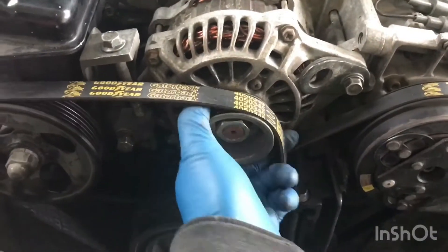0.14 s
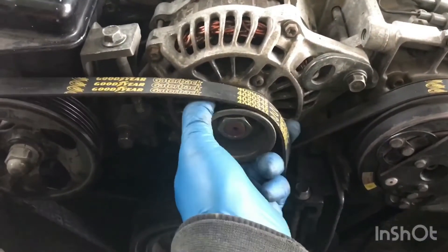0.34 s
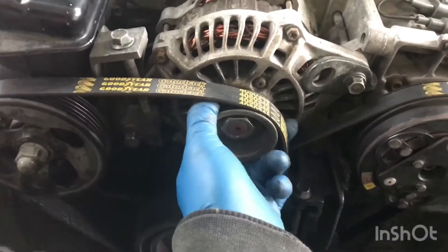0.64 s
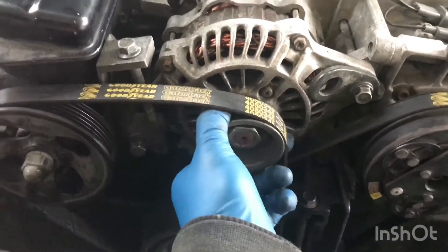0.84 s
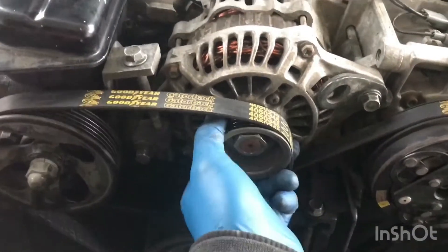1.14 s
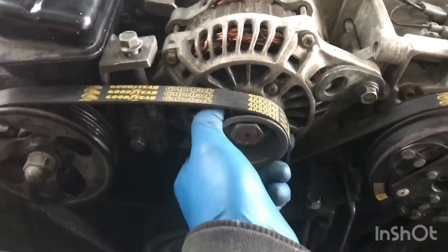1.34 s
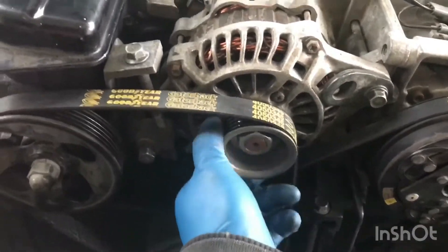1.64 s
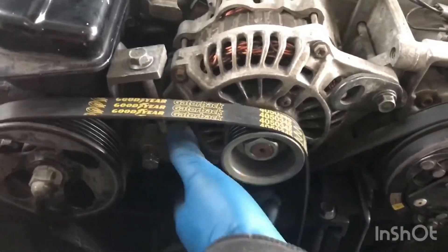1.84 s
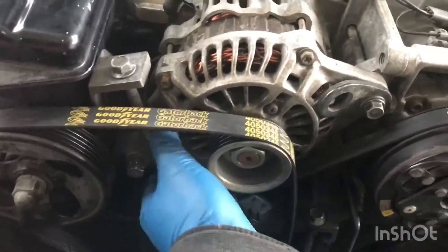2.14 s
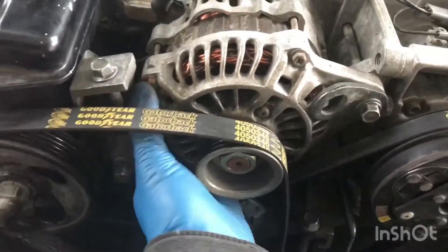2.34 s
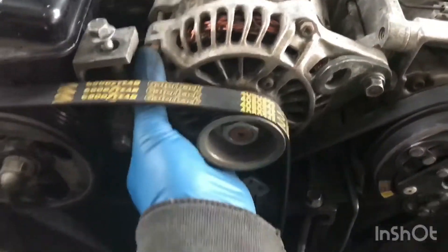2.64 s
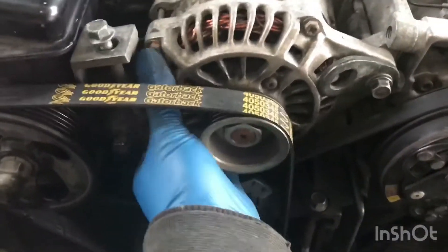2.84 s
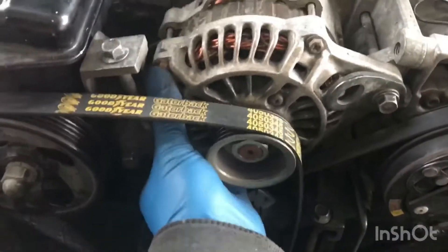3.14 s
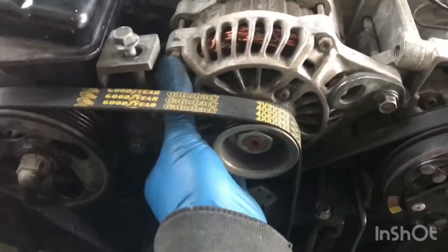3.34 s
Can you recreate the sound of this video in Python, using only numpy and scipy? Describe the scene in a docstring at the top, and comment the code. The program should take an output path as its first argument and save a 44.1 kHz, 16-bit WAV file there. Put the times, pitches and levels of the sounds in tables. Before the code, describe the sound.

Belt ribs snap over a pulley rim, bright and hard with short metallic rings, after quiet glove rubs and one rough squeak; close microphone, small engine bay, light workshop echo, steady faint air and rumble.

```python
"""Soft strokes of a gloved hand on a ribbed belt, over steady air and a wavering low rumble.
Stick-slip friction squeaks once, with a narrow noisy creak from just before the squeak until just after it.
Ribs snap over the pulley rim as the hand works the belt off: each snap is a broadband crack, treble first,
with damped modes of pulley and bracket; soft scrapes, faint long rings and slaps of the slack span join in.
Decaying noise gives the short tails of a quiet engine bay and its workshop around a close microphone."""
import sys
import numpy as np
from scipy import signal
from scipy.fft import rfft, irfft
from scipy.io import wavfile
from scipy.ndimage import uniform_filter1d

SR = 44100
rng = np.random.default_rng(int(sys.argv[2]) if len(sys.argv) > 2 else 0)


def wav_record(signal):
    """Record a signal, one row per channel, as 16-bit PCM in the file named by sys.argv[1]."""
    frames = np.transpose(np.atleast_2d(signal))
    bounded = np.clip(frames, -1, 1)
    # unit amplitude maps onto the largest positive 16-bit level
    quanta = np.round(bounded * 32767).astype(np.int16)
    wavfile.write(sys.argv[1], SR, quanta)


N = 154350  # samples

# spectrum of the steady air: (frequency [Hz], relative density [dB per Hz])
AIR_SPECTRUM = [(76, -24.5), (130, -0.5), (172, -14), (238, -11.5), (342, -15), (935, -19), (1170, -20),
                (1400, -21.5), (2090, -31.5), (10500, -54), (16000, -45.5)]
AIR_DB = -55.5
# spectrum of the low rumble: (frequency [Hz], relative density [dB per Hz])
RUMBLE_SPECTRUM = [(20, -34), (32, -16), (42, 0.5), (62, 5), (90, 6), (125, -15.5), (170, -11.5),
                   (300, -39)]
# wavering of the rumble: (time [s], level [dB])
RUMBLE_ENVELOPE = [(0, -54.5), (.2, -54), (.28, -45.5), (.5, -49), (.62, -57), (.85, -48), (1.55, -55),
                   (1.95, -55), (2.1, -46), (2.3, -49.5), (2.9, -49.5), (3.2, -51)]

# strokes of glove and belt: (peak time [s], rise [s], fall [s], level [dB], treble tilt [dB per octave])
RUB_STROKES = [(0.1, 0.0065, .018, -51, 3.5), (.17, 0.046, 0.04, -52, -1), (.235, 0.044, 0.043, -53.5, -2),
               (.39, 0.086, .05, -71, 1), (.92, 0.057, .05, -58, -5), (1.015, 0.027, .03, -56, 1.5),
               (1.75, 0.099, .045, -56.5, 1.5), (1.866, 0.02, .014, -46, 3),
               (1.91, 0.036, .05, -52.5, -0.5), (2.011, 0.076, .055, -55, 2),
               (2.159, 0.015, .04, -56, -2.5), (2.271, 0.024, .03, -50, 2.5), (2.385, 0.034, 0.022, -50, 6),
               (2.47, 0.066, .12, -63, 1), (2.635, 0.018, 0.032, -60.5, -3.5),
               (2.729, 0.012, 0.021, -40.5, -5.5), (3.028, 0.019, 0.014, -47.5, -3)]
# spectrum of the friction grains before the tilt: (frequency [Hz], relative density [dB per Hz])
RUB_SPECTRUM = [(300, -20), (1900, -6), (3200, -2), (5500, -7), (8500, -8.5), (10500, -12.5), (14000, -11),
                (17000, -21)]
RUB_GRAIN_DB, RUB_FLUTTER_DB = 1.5, 2.5  # rms of the fast and the slow level variation
CATCHES_PER_S, CATCH_DB = 30, 16.5  # single sticks and slips; gain of what each adds to its grain

# stick-slip tone: (time [s], pitch [Hz], level of partials 1, 2, 3 and 4 [dB each])
SQUEAK_TRACK = [(0.783, 372, -69, -53, -85, -79), (0.811, 371.5, -43, -40.5, -50, -52),
                (0.843, 388.7, -35.5, -39, -44, -55.5), (0.867, 392.2, -42, -45, -49.5, -61.5),
                (0.89, 387.6, -46, -42, -51, -67), (0.92, 376.8, -53, -37.5, -48, -64),
                (0.96, 387.7, -66, -70, -52, -65)]
SQUEAK_JITTER = 0.018  # rms pitch deviation, as a fraction
SQUEAK_EDGE_DB = -21  # sixth partial relative to the third
SQUEAK_RASP_DB, RASP_HZ = -8, 107.1  # rough sidebands at partial 2, and roughly how far they reach
SQUEAK_WET_DB, SQUEAK_T60_S = -1.5, 0.81  # workshop tail of the squeak
SQUEAK_TAIL_LO_HZ = 563  # the workshop returns little below this
# narrow noisy creak, from just before the squeak until just after it: (time [s], level [dB])
CREAK_ENVELOPE = [(.745, -73), (.772, -52.5), (.82, -48.5), (.97, -55), (1.03, -67)]
CREAK_HZ, CREAK_WIDTH_HZ = 508, 110

# rib snaps: (time [s], level in each of the five bands [dB each], contact resonance [Hz],
# crack decay constant at 3 kHz [ms])
RIB_SNAPS = [(1.1719, -59, -56, -44, -41.5, -47, 8470, 2.3), (1.29, -68, -40, -34.5, -27.5, -35, 8190, 2.7),
             (1.2949, -47, -31.5, -29.5, -36, -65, 1220, 2.1),
             (1.3651, -61, -40, -26, -39.5, -77, 2640, 5.2), (1.64, -45, -16, -19.5, -21.5, -37, 1222, 3.2),
             (1.6454, -35.5, -53, -26.5, -49, -35, 1225, 8.9), (1.6551, -37, -24, -29, -33, -41, 1170, 4),
             (2.0568, -57, -53, -41.5, -45, -81, 2160, 6.6),
             (2.291, -48.5, -28.5, -13.5, -21, -25.5, 2638, 4.7),
             (2.7369, -40.5, -32, -21, -24.5, -28.5, 7820, 2.7),
             (2.749, -53, -50, -51.5, -33, -41, 9520, 2.2),
             (3.0375, -36, -17, -14, -16.5, -22.5, 8970, 4.6),
             (3.041, -31.5, -17, -26, -24.5, -38.5, 1177, 4.8),
             (3.2909, -55, -55, -42, -40, -52, 5520, 2.7), (3.2980, -42, -34, -25, -23, -24.5, 14500, 4.8),
             (3.3260, -42, -37.5, -27.5, -19, -29.5, 8650, 3), (3.3411, -47.5, -38, -21, -49, -53, 1950, 3)]
# edges of the five snap bands: (frequency [Hz])
SNAP_BAND_EDGES = [200, 900, 1600, 4400, 10000, 16500]
# spectrum of the crack before its band levels: (frequency [Hz], relative level [dB])
CRACK_SPECTRUM = [(150, -3), (280, -1), (380, -7.5), (590, 0), (800, 1), (1000, -4.5), (1280, -4),
                  (1700, 0.5), (2250, -4), (2700, -4), (3800, -6.5), (4900, 0), (6600, -5), (9100, -4.5),
                  (10100, -14), (11400, -6), (13000, -12), (16000, -18.5)]
CRACK_RISE_S = 0.00044
SPREAD_S = 0.0016  # bending-wave delay at 1 kHz, inversely proportional to frequency
TREBLE_DAMPING = 0.17  # decay time falls as this power of frequency
# modes of pulley and bracket: (frequency [Hz], relative level [dB], t60 [s])
METAL_MODES = [(607.7, -5, 0.16), (973, -2, 0.067), (1135, -2, 0.083), (1226, 6.5, .05), (1322, 1.5, 0.057),
               (1400, 2.5, 0.051), (1963, 3.5, 0.029), (2582, 3, .023), (3120, -5, .035),
               (3607, -7.5, 0.057), (4048, -2.5, .04), (6780, -7.5, .06), (9200, -3.5, 0.032),
               (9319, -7, 0.056)]
MODE_DB, MODE_SCATTER_DB = -13.5, 1  # common offset, and rms scatter from snap to snap
MODE_DRIFT = 0.002  # rms detuning by the pull of the belt, as a fraction
CONTACT_DB, CONTACT_T60_S = -0.5, 0.016  # relative level and short ring of the spot that the rib hits

# reflections: (centre [Hz], bay level [dB], bay t60 [s], workshop level [dB], workshop t60 [s])
SPACE_BANDS = [(250, -1, 0.18, -14, 1), (674, -2.5, 0.14, -11.5, 0.63), (1400, -14, 0.068, -28.5, .6),
               (2990, -12.5, 0.15, -21, 0.4), (7160, -12.5, 0.11, -25, 0.42), (13000, -26, 0.1, -23, 0.083)]
RING_SEND_DB = -5.5  # the modes feed the echoes less than the crack does

# soft scrapes of the belt on the rim: (time [s], decay constant [s], level [dB], centre [Hz])
RIM_SCRAPES = [(1.312, 0.042, -52.5, 620), (1.331, 0.031, -43.5, 1660), (1.348, 0.01, -42, 890),
               (1.386, 0.0074, -42, 2270), (1.608, 0.015, -47, 1940), (1.804, 0.019, -54, 290),
               (2.176, 0.0035, -44.5, 7970)]
# long faint rings of the freed pulley: (time [s], frequency [Hz], level [dB], t60 [s])
LONG_RINGS = [(1.365, 1466, -29.5, 0.15), (1.366, 1986, -29.5, 0.11), (1.366, 3480, -49, .24),
              (1.366, 5340, -69, .9), (1.366, 6850, -48, 0.12), (2.738, 1943, -51, 0.6),
              (3.039, 6775, -43.5, 0.28), (3.04, 3521, -42, 0.28), (3.327, 5335, -60, 1),
              (3.341, 1955, -48, 0.74)]
# slaps of the slack belt: (time [s], level [dB])
BELT_SLAPS = [(1.656, -41), (2.295, -57), (2.741, -57.5), (3.045, -37.5)]
# modes of the belt span: (frequency [Hz], relative level [dB], t60 [s])
BELT_MODES = [(129.5, 4.5, 0.12), (191.6, -9, 0.72), (254, 6.5, 0.091), (323, -12.5, 0.16)]

TOP_HZ = 15900  # upper limit of the sound


def undb(db):
    """Logarithmic level: converts decibels to an amplitude gain."""
    return 10 ** (np.asarray(db) / 20)


def unit(x):
    """Normalisation: scales to an rms of 1."""
    return x / np.sqrt(np.mean(x ** 2))


def add(out, start, x):
    """Superposition: mixes x into out from a start time in seconds."""
    i = int(start * SR)
    out[i:i + len(x)] += x[:len(out) - i]


def band(x, lo, hi, order=3):
    """Band limitation: a causal Butterworth band-pass."""
    hi = min(hi, SR / 2 - 1000)
    return signal.sosfilt(signal.butter(order, [lo, hi], "band", fs=SR, output="sos"), x)


def colour(x, points, tilt_db=0):
    """Spectral shaping: weights x by (Hz, dB) points and a tilt per octave, then sets its rms to 1."""
    hz, db = np.array(points).T
    octave = np.log2(np.fft.rfftfreq(len(x), 1 / SR) + 1)  # the 1 avoids log of zero
    weight_db = np.interp(octave, np.log2(hz), db, left=-90) + tilt_db * octave
    return unit(irfft(rfft(x) * undb(weight_db), len(x)))


def walk(rate):
    """Smoothed chance: random steps at a rate in Hz, averaged twice, with an rms of 1."""
    k = int(SR / rate)
    steps = np.repeat(rng.standard_normal(N // k + 1), k)
    return unit(uniform_filter1d(uniform_filter1d(steps, k), k)[:N])


def fade(t, t60):
    """Exponential decay: falls by 60 dB in t60 seconds."""
    return np.exp(-np.log(1000) * t / t60)


def ring(modes, t):
    """Modal superposition: sums damped sines of random phase."""
    total = 0
    for hz, db, t60 in modes:
        total = total + undb(db) * fade(t, t60) * np.sin(2 * np.pi * (hz * t + rng.random()))
    return total


def workshop():
    """Coloured noise: steady air, and a low rumble with a wavering level."""
    level_db = np.interp(np.arange(N) / SR, *np.array(RUMBLE_ENVELOPE).T)
    air = undb(AIR_DB) * colour(rng.standard_normal(N), AIR_SPECTRUM)
    rumble = undb(level_db) * colour(rng.standard_normal(N), RUMBLE_SPECTRUM)
    return air + rumble


def rubbing():
    """Sliding friction: fine irregular grains of noise swell with each stroke of glove and belt."""
    out, t = np.zeros(N), np.arange(N) / SR
    catches = undb(CATCH_DB) * (rng.random(N) < CATCHES_PER_S / SR)
    roughness = undb(RUB_GRAIN_DB * walk(1500) + RUB_FLUTTER_DB * walk(70))
    grains = unit(rng.standard_normal(N) * (1 + catches) * roughness)
    for peak, rise, fall, db, tilt_db in RUB_STROKES:
        swell = np.exp(-0.5 * ((t - peak) / np.where(t < peak, rise, fall)) ** 2)
        shifted = np.roll(grains, rng.integers(N))  # different grains under each stroke
        out += undb(db) * swell * colour(shifted, RUB_SPECTRUM, tilt_db)
    return out


def squeak():
    """Stick-slip oscillation: a noisy creak under rough, unsteady harmonics that linger in the workshop."""
    t = np.arange(N) / SR
    when, hz, *levels = np.array(SQUEAK_TRACK).T
    pitch = np.interp(t, when, hz) * (1 + SQUEAK_JITTER * walk(200))
    phase = 2 * np.pi * np.cumsum(pitch) / SR
    partials = list(enumerate(levels, 1)) + [(6, levels[2] + SQUEAK_EDGE_DB)]
    tone = 0
    for k, db in partials:
        # complex modulation makes the rough sidebands, stronger on higher partials
        rasp = undb(SQUEAK_RASP_DB) * np.sqrt(k / 2) * (walk(2 * RASP_HZ) + 1j * walk(2 * RASP_HZ))
        gain = undb(np.interp(t, when, db, left=-150, right=-150))
        tone = tone + gain * np.imag((1 + rasp) * np.exp(1j * k * phase))
    half_width = CREAK_WIDTH_HZ / 2
    creak = unit(band(rng.standard_normal(N), CREAK_HZ - half_width, CREAK_HZ + half_width, order=2))
    creak_db = np.interp(t, *np.array(CREAK_ENVELOPE).T, left=-150, right=-150)
    direct = tone + creak * undb(creak_db)
    tail = rng.standard_normal(SR) * fade(t[:SR], SQUEAK_T60_S)
    tail = band(tail / np.linalg.norm(tail), SQUEAK_TAIL_LO_HZ, TOP_HZ, order=2)
    return direct + undb(SQUEAK_WET_DB) * signal.fftconvolve(direct, tail)[:N]


def snaps():
    """Impact and dispersion: each rib cracks, treble first, and excites metal modes: (cracks, rings)."""
    cracks, rings, t = np.zeros(N), np.zeros(N), np.arange(SR // 5) / SR
    attack = 1 - np.exp(-t / CRACK_RISE_S)
    for start, *levels, contact_hz, decay_ms in RIB_SNAPS:
        modes = [(contact_hz, CONTACT_DB, CONTACT_T60_S)]
        for hz, db, t60 in METAL_MODES:
            mode_hz = hz * (1 + MODE_DRIFT * rng.standard_normal())
            mode_db = db + MODE_DB + MODE_SCATTER_DB * rng.standard_normal()
            modes.append((mode_hz, mode_db, t60))
        metal = ring(modes, t)
        noise = colour(rng.standard_normal(len(t)), CRACK_SPECTRUM)
        for lo, hi, db in zip(SNAP_BAND_EDGES, SNAP_BAND_EDGES[1:], levels):
            khz = (lo + hi) / 2000  # band centre
            decay_s = decay_ms / 1000 * (khz / 3) ** -TREBLE_DAMPING
            sources = np.array([noise * np.exp(-t / decay_s), metal]) * attack
            crack, tone = band(sources, lo, hi, order=4)
            # the level is the rms of crack and ring together over the first 10 ms
            gain = undb(db) / np.sqrt(np.mean((crack + tone)[:SR // 100] ** 2))
            arrival = start + SPREAD_S / khz
            add(cracks, arrival, gain * crack)
            add(rings, arrival, gain * tone)
    return cracks, rings


def reflections(x):
    """Reverberation: convolves x with decaying noise, quick for the engine bay and weak for the workshop."""
    t = np.arange(SR) / SR
    onset = 1 - np.exp(-(t / 0.0015) ** 2)
    response = 0
    for hz, bay_db, bay_t60, shop_db, shop_t60 in SPACE_BANDS:
        for db, t60 in ((bay_db, bay_t60), (shop_db, shop_t60)):
            tail = rng.standard_normal(len(t)) * fade(t, t60) * onset
            tail = tail / np.linalg.norm(tail)  # unit energy before the band-pass
            response = response + undb(db) * band(tail, hz / 1.79, hz * 1.555, order=2)
    return signal.fftconvolve(x, response)[:N]


def scrapes():
    """Brief friction: band-limited noise decays as the belt catches on the rim."""
    out, t = np.zeros(N), np.arange(SR // 5) / SR
    for start, fall, db, hz in RIM_SCRAPES:
        noise = unit(band(rng.standard_normal(len(t)), hz / 2.3, hz * 1.6, order=2))
        add(out, start, undb(db) * np.exp(-t / fall) * noise)
    return out


def pulley_rings():
    """Free vibration: lightly damped modes of the freed pulley sing on faintly after some snaps."""
    out, t = np.zeros(N), np.arange(SR) / SR
    for start, hz, db, t60 in LONG_RINGS:
        add(out, start, ring([(hz, db, t60)], t))
    return out


def slaps():
    """Span vibration: the slack belt flaps in its low modes after some snaps."""
    out, t = np.zeros(N), np.arange(SR // 2) / SR
    attack = 1 - np.exp(-t / 0.00066)
    for start, db in BELT_SLAPS:
        add(out, start, undb(db) * ring(BELT_MODES, t) * attack)
    return out


def scene():
    """Superposition: room, rubbing and squeak, with snaps, scrapes and slaps and their echoes."""
    background = workshop() + rubbing() + squeak()
    cracks, rings = snaps()
    blows = cracks + scrapes() + slaps()
    echoes = reflections(blows + undb(RING_SEND_DB) * rings)
    return (background + blows + rings + echoes + pulley_rings())[None]


def record(dry):
    """Amplitude and band limits: clips at full scale, then cuts the treble with a steep low-pass."""
    low_pass = signal.ellip(8, 0.2, 70, TOP_HZ, fs=SR, output="sos")
    return signal.sosfilt(low_pass, np.clip(dry, -1, 1))


dry = scene()
out = record(dry)
wav_record(out)
```